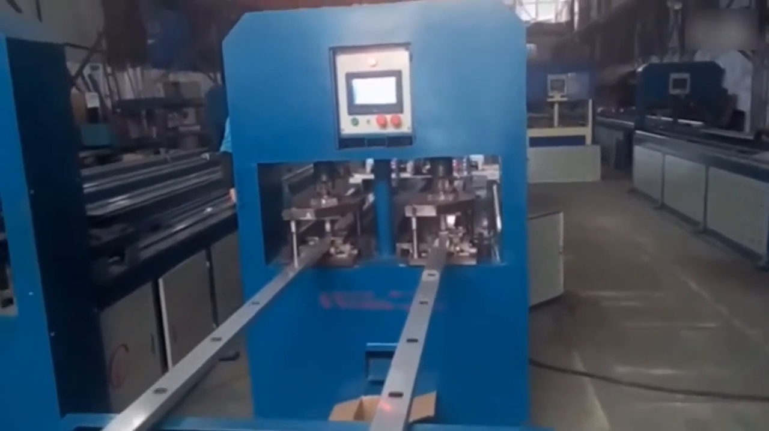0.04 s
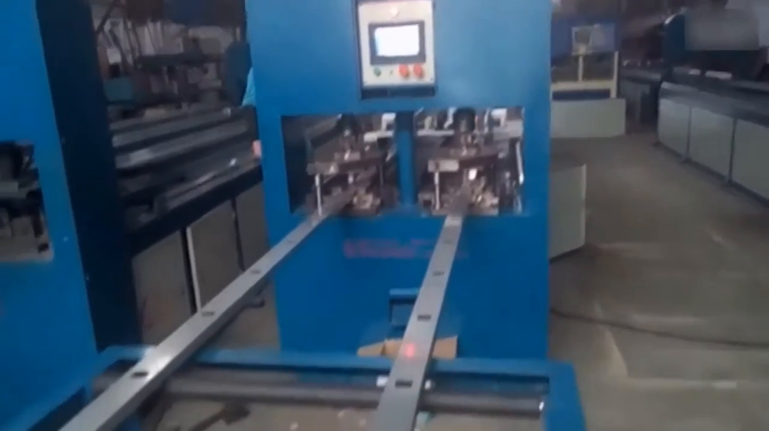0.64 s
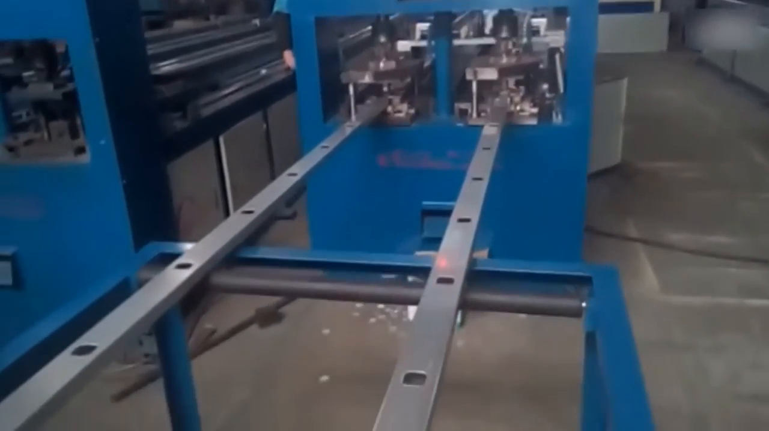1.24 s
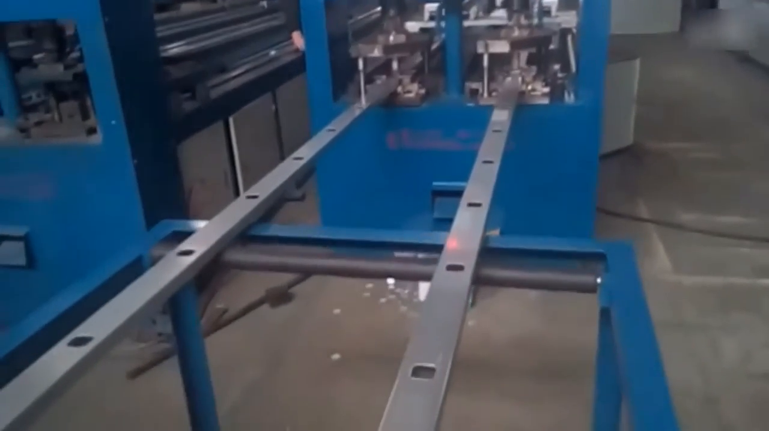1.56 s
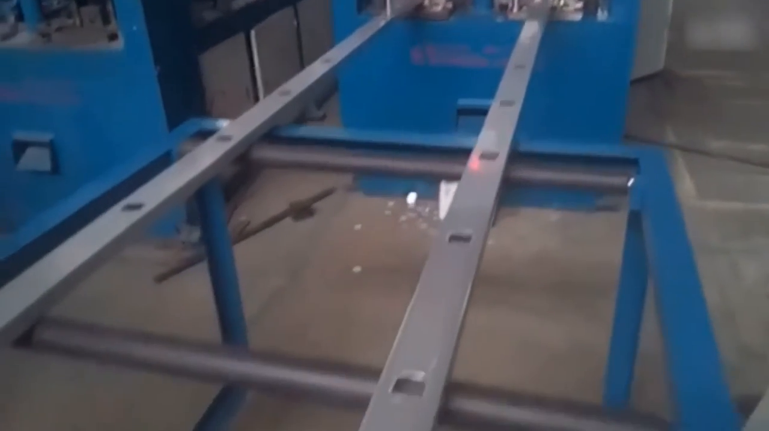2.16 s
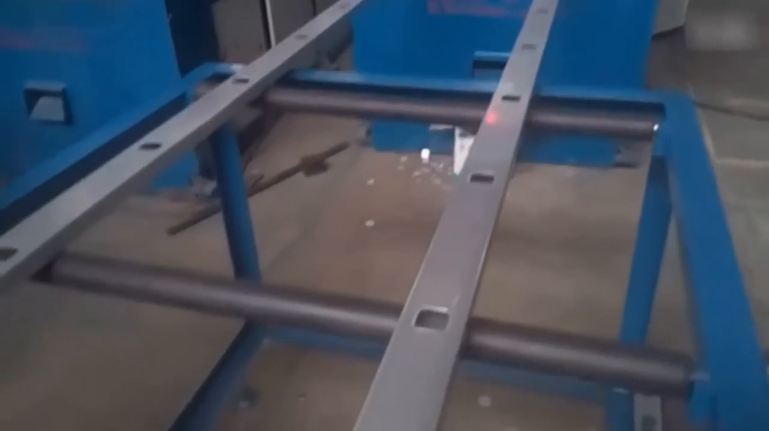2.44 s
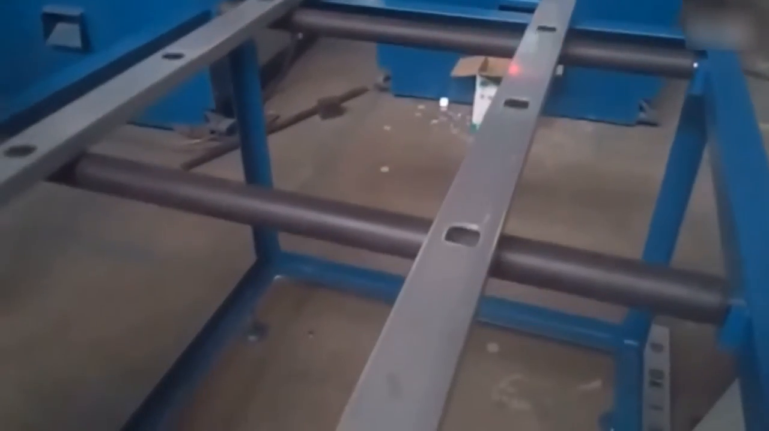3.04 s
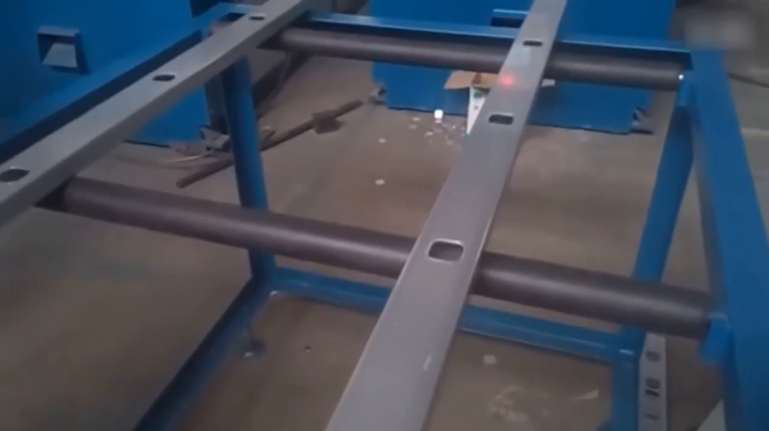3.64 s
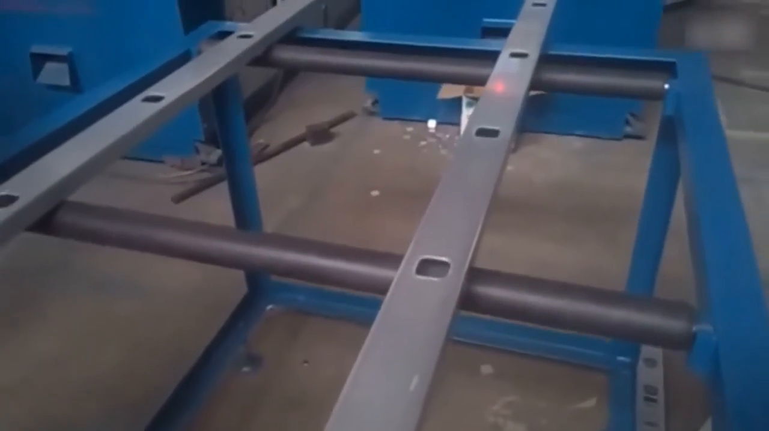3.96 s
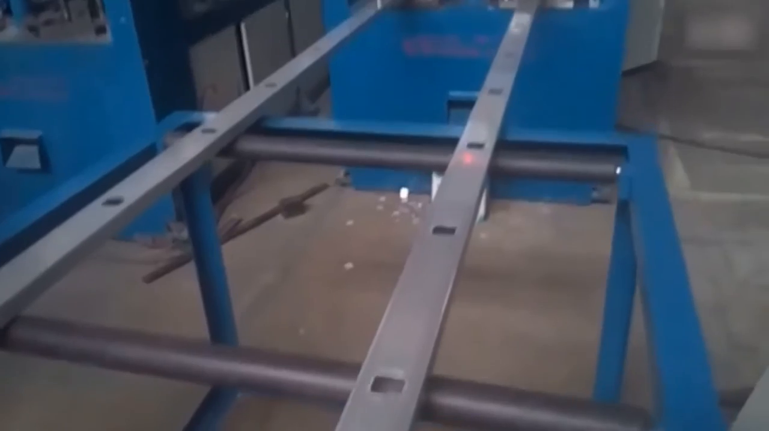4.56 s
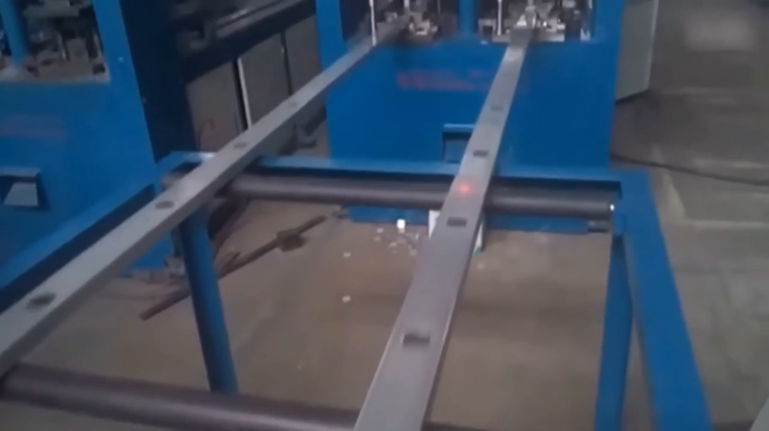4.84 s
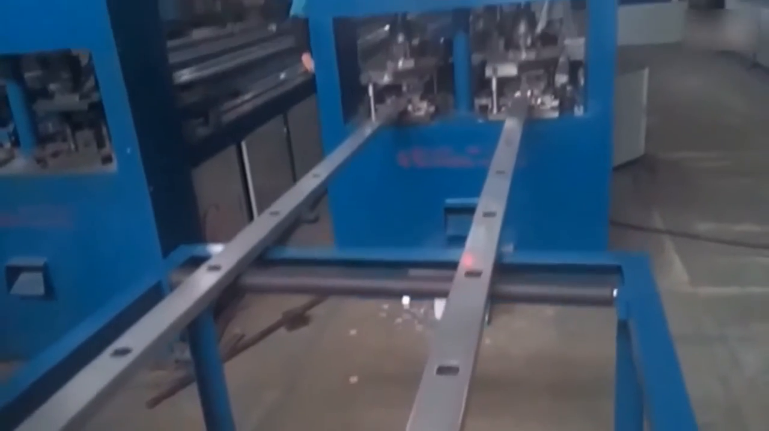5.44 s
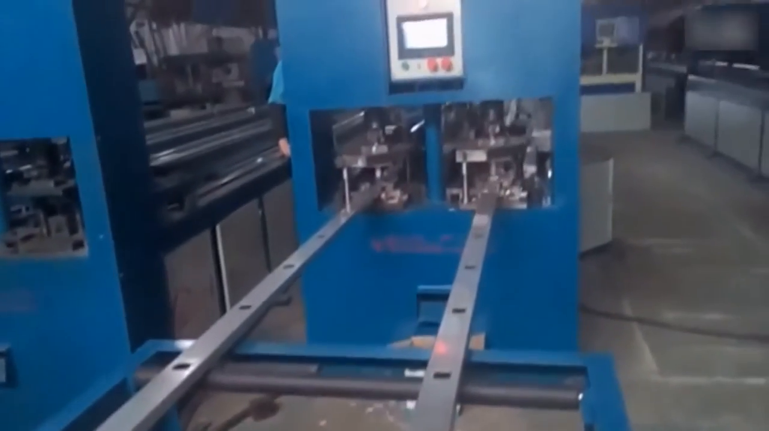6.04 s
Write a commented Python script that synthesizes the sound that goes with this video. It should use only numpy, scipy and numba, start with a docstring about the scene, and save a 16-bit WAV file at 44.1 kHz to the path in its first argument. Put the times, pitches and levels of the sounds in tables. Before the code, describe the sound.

A punching machine strikes metal bars four times with sharp, ringing clanks, while rollers rumble and clatter over a factory drone.

```python
"""Punching metal in a factory hall

A machine punches two hollow metal bars, one stroke about every 1.55 s. The bars rumble and knock
forward over rollers and clack in their guides. The punch strikes, the bars ring, and it pulls out
with a puff of air. Another machine clanks further off, over the drone of the hall.
A phone's automatic volume control turns the sound down after each loud blow."""
import sys
import numpy as np
from scipy import signal
from scipy.fft import rfft, irfft, next_fast_len
from scipy.io import wavfile
from scipy.ndimage import uniform_filter1d, minimum_filter1d
from numba import njit

SR = 44100
rng = np.random.default_rng(int(sys.argv[2]) if len(sys.argv) > 2 else 0)


def generate_wav(signal):
    """Clip the signal to [-1, 1] and save it as 16-bit WAV at the path in sys.argv[1]."""
    frames = np.transpose(np.atleast_2d(signal))
    scaled = np.clip(frames, -1, 1) * 32767
    pcm = np.round(scaled).astype(np.int16)
    wavfile.write(sys.argv[1], SR, pcm)


N = 277830
TIME = np.arange(N) / SR

# Punch strokes. Each brings out one extra note, set by the length of the bar.
# start_s, swell_s, blow_db, clank_db, ring_db, note_hz, note_db
STROKES = [(1.065, 0.003, -2, -4.5, -1.5, 3095, 2.5), (2.622, 0.0022, 2, -7.5, -2, 2630, -11),
           (4.15, 0.022, -0.5, -12, -1.5, 3874, -5.5), (5.705, 0.019, 0.5, -3, 0.5, 2750, -5)]
# The punch pulling back out: start_s, jolt_db, air_db, squeak_db, ring_db
RETURNS = [(1.242, -14, -1, -18, -8.5), (2.796, -12, -11, -9.5, -8.5), (4.335, -17, 1.5, -7.5, -6),
           (5.880, -10.5, 1, -19.5, -3)]
# Tone of the blow: pitch_hz, level_db
BLOW_TONE = [(100, -38.5), (600, -12.5), (1200, 5.5), (1750, 11), (3000, 10.5), (4200, 12), (5500, 6.5),
             (7000, 3), (10000, 16), (15000, -11)]
# Notes of the die, the block under the punch: pitch_hz, level_db, fade_s (time to fall by 60 dB)
DIE_NOTES = [(1668, 7.5, 0.094), (1865, 4, 0.096), (1915, -11.5, 0.099), (2190, -1, 0.2), (2523, 7, 0.11),
             (2716, 0.5, 0.48), (3110, -4, 0.92)]

def punch():
    """The punch snaps and crunches through the metal, clanks on the die and jolts as it pulls out."""
    snap = bursts([(start, swell, 0.17, db) for start, swell, db, *_ in STROKES])
    crunch = bursts([(start, swell + 0.012, 0.45, db - 5) for start, swell, db, *_ in STROKES])
    jolt = bursts([(start, 0.022, 0.25, db) for start, db, *_ in RETURNS])
    contact = (np.hypot(snap, crunch) + jolt) * grains(BLOW_TONE, rough_db=1)
    clank = sum(undb(db) * ring(start + swell / 2, DIE_NOTES, swell,
                                flutter_db=2.5, waver_hz=24, detune=0.025)
                for start, swell, _, db, *_ in STROKES)
    return contact + clank


# Notes of the struck bars and die: pitch_hz, level_db, fade_s
BAR_NOTES = [(1506, -15.5, 0.38), (1670, -25, 0.41), (2040, 1, 0.63), (2250, -3.5, 1.1), (2250, -0.5, 0.56),
             (2508, -3.5, 0.79), (2504, -6, 0.83), (2712, 6, 0.58), (2940, -5.5, 1.1), (3170, -7, 0.68),
             (3190, -9, 0.54), (3370, -7.5, 0.6), (3640, 0.5, 0.46), (4300, -16, 0.19), (5100, -13.5, 0.85),
             (5210, -7.5, 0.69)]

def ringing_bars():
    """Every stroke and every return sets the bars shimmering, rattling and ringing."""
    blows = [(start, db) for start, _, _, _, db, *_ in STROKES]
    blows += [(start, db) for start, *_, db in RETURNS]
    shaking = bursts([(start, 0.02, 0.72, db) for start, db in blows])
    jangle = shaking * (undb(-6) * shimmer() + undb(-7) * rattle())
    notes = sum(undb(db - 14.5) * ring(start, BAR_NOTES, swell_s=0.05,
                                       flutter_db=-0.5, waver_hz=18.8, detune=0.012)
                for start, db in blows)
    extra_notes = sum(ring(start + 0.025, [(hz, db, 0.33)], swell_s=0.06, flutter_db=3, waver_hz=28)
                      for start, *_, hz, db in STROKES)
    return jangle + notes + extra_notes


def rattle(bounces_per_s=45, scatter_db=5, fade_share=0.2):
    """The loose bars bounce at random. Each bounce plays a new mix of notes, cut short by the guides."""
    bounces = np.flatnonzero(rng.random(N) < bounces_per_s / SR)
    out = 0
    for hz, db, fade in BAR_NOTES:
        force = np.zeros(N)
        force[bounces] = undb(db + scatter_db * np.tanh(rng.standard_normal(N)[bounces]))
        # this filter turns each bounce into a fading note
        pole = np.exp((2j * np.pi * hz - np.log(1000) / (fade * fade_share)) / SR)
        out = out + signal.lfilter([1], [1, -pole], force).imag
    return unit(out)


# Groups of close notes in the metalwork: pitch_hz, width_hz, level_db
METAL_BANDS = [(1757, 170, 1.5), (1950, 345, 6), (2259, 89, 9.5), (2740, 860, 3.5), (3090, 240, -3.5),
               (3660, 210, 1)]

def shimmer():
    """Many close notes of the metalwork blur into a steady, ringing noise."""
    return resonate(rng.standard_normal(N), METAL_BANDS)


# Tone of the puff of air: pitch_hz, level_db
AIR_TONE = [(1000, -45), (3000, -27), (4500, 12.5), (6500, 2.5), (8500, -21), (11000, -17), (15000, -13),
            (18000, 18.5)]

def pull_out(low_hz=1500, high_hz=2250, glide_s=0.02):
    """A valve lets out air, and the punch slides out of the hole with a rough, rising squeak."""
    puffs = bursts([(start, 0.024, 0.14, db) for start, _, db, *_ in RETURNS])
    out = puffs * grains(AIR_TONE, rough_db=1)
    for start, _, _, db, _ in RETURNS:
        hz = high_hz + (low_hz - high_hz) * np.exp(-np.maximum(TIME - start, 0) / glide_s)
        squeak = wavering_note(hz, waver=0.05, rate_hz=700)
        out += undb(db + 3 * wander(220)) * rise_hold_fall(start, 0.02, 0.03, 0.035) * squeak
    return out


# The feed that moves the bars forward before each stroke: pull_db, slide_db, brake_db, growl_db
FEEDS = [(-26, -24.5, -16.5, -25.5), (-24, -19, -15.5, -20), (-21.5, -22.5, -18.5, -27),
         (-24.5, -22, -16.5, -23.5)]
# The bars jerking in their guides: start_s, swell_s, body_db, sizzle_db
JERKS = [(0.549, 0.046, -13.5, -8.5), (2.096, 0.059, -10, -9), (3.67, 0.019, -11.5, -5),
         (5.022, 0.019, -24, -16), (5.22, 0.037, -13, -15.5)]
# Tones of the clatter's body and of its bright sizzle: pitch_hz, level_db
BODY_TONE = [(100, -1), (400, 0.5), (800, 4.5), (1200, 6.5), (2000, 4.5), (2800, 2.5), (4000, -7.5),
             (6000, -13), (9000, -22), (15000, -36)]
SIZZLE_TONE = [(1000, -20), (2500, 14), (3700, 7), (5200, 5.5), (6500, 0.5), (8000, 11.5), (10500, 4),
               (12000, -13), (15000, -18)]

def clatter(slide_lead_s=0.267, brake_lead_s=0.12, sizzle_fade_share=0.86):
    """The bars chatter against their guides as they jerk, slide and brake before each stroke."""
    body = unit(grains(BODY_TONE, rough_db=3) + undb(-5) * shimmer())
    sizzle = grains(SIZZLE_TONE, rough_db=2.5)
    # start_s, swell_s, fade_s, body_db, sizzle_db
    contacts = [(start, swell, 0.35, *levels) for start, swell, *levels in JERKS]
    for (strike, *_), (_, slide_db, brake_db, _) in zip(STROKES, FEEDS):
        contacts.append((strike - slide_lead_s, 0.03, 0.31, slide_db - 7, slide_db))
        contacts.append((strike - brake_lead_s, 0.048, 1, brake_db, brake_db - 13.5))
    body_level = bursts([row[:4] for row in contacts])
    sizzle_level = bursts([(start, swell, fade * sizzle_fade_share, db)
                           for start, swell, fade, _, db in contacts])
    return body * body_level + sizzle * sizzle_level


# The bars hitting their steel guides: start_s, level_db
CLACKS = [(0.586, -23.5), (0.600, -10), (0.823, -18.5), (1.000, -19), (2.15, -14), (2.173, -12),
          (2.386, -18), (2.537, -17), (2.552, -11.5), (3.685, -16.5), (3.705, -10.5), (3.93, -17.5),
          (4.352, -11), (5.241, -9.5), (5.260, -14), (5.487, -21)]
# Tone of a crack or a scrape: pitch_hz, level_db
CRACK_TONE = [(1500, -22), (3600, 0), (6500, 0), (9000, -3), (11000, -8), (15000, -22), (18000, -40)]
# Where the guides ring: pitch_hz, width_hz, level_db
GUIDE_BANDS = [(1104, 160, -2.5), (1850, 180, 0), (2340, 240, -6.5), (2800, 270, 1.5), (3240, 170, 1),
               (3870, 260, -1), (4380, 300, -13.5), (5320, 500, -12.5)]

def clacks():
    """Steel hits steel: a bright crack, then a brief, rough chatter in the guide."""
    crack_level = bursts([(start, 0.001, 0.066, db - 2) for start, db in CLACKS])
    crack = grains(CRACK_TONE, rough_db=6)
    chatter_level = bursts([(start, 0.003, 0.096, db + 2.5) for start, db in CLACKS])
    chatter = resonate(rng.standard_normal(N) * undb(3 * wander(350)), GUIDE_BANDS)
    return crack_level * crack + chatter_level * chatter


# Scrapes of the bars' edges and the clamps: start_s, swell_s, fade_s, level_db
SCRAPES = [(0.355, 0.0079, 0.087, -37), (0.806, .005, .2, -21), (0.972, 0.0028, 0.072, -22),
           (1.185, 0.03, 0.37, -15), (1.43, 0.11, 0.94, -33), (1.76, 0.049, 0.37, -34.5),
           (2.265, .012, 0.14, -29), (2.538, 0.023, 0.096, -28.5), (4.066, .01, .15, -26.5),
           (4.143, .008, 0.11, -11), (4.315, 0.017, 0.14, -13.5), (4.862, 0.0034, 0.12, -32.5),
           (5.023, 0.0039, 0.15, -27.5), (5.626, 0.0071, .2, -38), (5.915, 0.013, 0.17, -15)]

def scrapes():
    """Sharp edges catch and slip in short, gritty bursts."""
    return bursts(SCRAPES) * grains(CRACK_TONE, rough_db=4, rate_hz=300)


# Tone of the rollers: pitch_hz, level_db
RUMBLE_TONE = [(25, -12), (55, -48), (110, 3), (190, -1), (280, -1), (500, 1), (750, -6.5), (1300, -35),
               (3000, -54), (8000, -58), (15000, -71.5)]

def rollers(lead_s=0.671, rise_s=0.026, stop_lead_s=0.0096, surge_hz=5.82, surge_db=4):
    """The rollers rumble in surges as they push the bars, then drop to idle as the punch strikes."""
    level = undb(-34.5)  # idling
    for (strike, *_), (pull_db, *_) in zip(STROKES, FEEDS):
        start = strike - lead_s
        load_db = np.interp(TIME, [start, strike], [pull_db, -24])
        load_db -= surge_db * np.cos(2 * np.pi * surge_hz * (TIME - start))
        pushing = rise_hold_fall(start, rise_s, lead_s - rise_s - stop_lead_s, 0.035)
        level = np.hypot(level, undb(load_db) * pushing)
    return level * grains(RUMBLE_TONE, rough_db=2.5, rate_hz=89)


# Dull knocks of the roller stand: start_s, pitch_hz, level_db
KNOCKS = [(0.065, 535, -12.5), (0.425, 499, -14), (0.473, 495, -15), (0.681, 308, -8), (0.828, 290, -11),
          (0.879, 240, -9.5), (0.953, 410, -9), (1.010, 543, -12.5), (1.040, 605, -14), (1.993, 437, -10),
          (2.138, 384, -15.5), (2.165, 445, -12.5), (2.184, 313, -4), (2.395, 427, -10.5),
          (3.294, 387, -14.5), (3.380, 375, -9), (3.544, 297, -12.5), (3.662, 296, -13), (3.726, 322, -17),
          (3.932, 227, -10.5), (4.053, 450, -12.5), (4.494, 295, -14.5), (5.047, 388, -14),
          (5.150, 318, -11.5), (5.270, 233, -12.5), (5.391, 305, -12), (5.600, 569, -11),
          (5.660, 595, -13.5), (6.016, 516, -8.5)]
# Notes within one knock: pitch_ratio, level_db, fade_s
KNOCK_NOTES = [(0.721, -10, 0.076), (1, 1, 0.1), (1.37, -2.5, 0.03)]

def knocks():
    """The bars bump over the rollers, and the stand answers with a short, hollow note."""
    out = 0
    for start, hz, db in KNOCKS:
        notes = [(hz * ratio, note_db, fade) for ratio, note_db, fade in KNOCK_NOTES]
        out = out + undb(db) * ring(start, notes, swell_s=0.0042, flutter_db=1, waver_hz=13.5)
    return out


# Brief, thin metal notes: start_s, length_s, pitch_hz, level_db
THIN_NOTES = [(0.297, 0.11, 5040, -31), (0.825, 0.04, 6250, -28), (2.655, 0.035, 2740, -10),
              (2.738, 0.024, 2634, -7), (3.163, 0.15, 2887, -25), (4.213, 0.06, 3870, -14),
              (4.668, 0.06, 5010, -23.5), (4.797, 0.1, 5010, -32), (5.925, 0.06, 3720, -20)]

def thin_notes():
    """Brief, unsteady metal notes: swells and tails of the bars' ringing, and a few high squeals."""
    out = 0
    for start, length, hz, db in THIN_NOTES:
        swell = np.sin(np.pi * np.clip((TIME - start) / length, 0, 1))
        level = undb(db + 3 * wander(110)) * swell
        out = out + level * wavering_note(hz, waver=0.00794, rate_hz=300)
    return out


# Where the machine's frame rings: pitch_hz, width_hz, level_db
FRAME_BANDS = [(123, 27, 2.5), (170, 23, -0.5), (239, 50, 3), (294, 54, -3)]

def growl(lead_s=0.55, rise_s=0.45, fall_s=0.024):
    """The drive works harder towards the end of each feed and shakes the frame."""
    hold_s = lead_s - rise_s - fall_s
    level = sum(undb(db) * rise_hold_fall(strike - lead_s, rise_s, hold_s, fall_s)
                for (strike, *_), (*_, db) in zip(STROKES, FEEDS))
    return level * resonate(rng.standard_normal(N), FRAME_BANDS)


# Clanks further down the hall: start_s, swell_s, fade_s, crash_db, boom_db, ring_db
FAR_CLANKS = [(0.042, 0.032, 0.56, -9, -14.5, -15), (0.140, 0.022, 1, -15.5, -24, -22.5),
              (4.619, 0.004, 0.46, -12, -13, -23), (4.773, 0.018, 0.14, -20, -27, -27.5)]
# Tones of their crash and boom: pitch_hz, level_db
CRASH_TONE = [(100, -41.5), (400, -13), (700, 1), (1050, 1), (1450, 5), (1900, 4), (2700, 7), (3800, 0),
              (5200, -4), (7000, -11), (10000, -16), (15000, -27)]
BOOM_TONE = [(300, -25), (550, -3), (850, -3.5), (1080, 3), (1400, -9), (2200, -15.5), (6000, -37)]
# Notes they ring with: pitch_hz, level_db, fade_s
FAR_NOTES = [(905, -13, 0.66), (1040, -11, 0.79), (1255, -5, 1), (1570, -1, .45), (1930, -4, 1),
             (2684, 1.5, 0.53), (2780, -1, 0.52), (3040, -11, 0.95), (3220, -12, 1)]

def far_machine():
    """Another machine crashes, booms and rings, blurred by distance."""
    crash = bursts([row[:4] for row in FAR_CLANKS]) * grains(CRASH_TONE, rough_db=-0.5, rate_hz=240)
    boom_level = bursts([(start, swell, fade, db) for start, swell, fade, _, db, _ in FAR_CLANKS])
    boom = boom_level * grains(BOOM_TONE, rough_db=8.5, rate_hz=900)
    notes = sum(undb(db) * ring(start + swell / 2, FAR_NOTES, swell, flutter_db=2.5, waver_hz=14)
                for start, swell, *_, db in FAR_CLANKS)
    return crash + boom + notes


def buzz(delay_s=0.33, idle_db=-29.5, moving_db=-23.5):
    """Loose metalwork buzzes, louder and with a hiss while the punch head travels back."""
    strikes = [start for start, *_ in STROKES]
    strikes.insert(0, strikes[0] - 1.67)  # the machine is already running
    travel = sum(rise_hold_fall(strike + delay_s, 0.15, 0.3, 0.11) for strike in strikes)
    level = np.hypot(undb(idle_db), undb(moving_db) * travel) * undb(2.6 * wander(60))
    return level * shimmer() + undb(-41) * travel * grains(SIZZLE_TONE, rough_db=1.5)


# Tone of the hall's noise: pitch_hz, level_db
HALL_TONE = [(25, -16.5), (45, -15.5), (70, -5), (120, -0.5), (200, 0), (290, 3), (400, -3), (900, -3),
             (1400, -7), (2300, -5), (3200, -7.5), (4300, -19.5), (5200, -16.5), (7000, -23)]
# Notes of the pumps: pitch_hz, level_db
PUMP_NOTES = [(119.5, -34.5), (296, -34.5), (314, -33)]
# A brief dip in the drone near the start: time_s, level_db
DRONE_DIP = [(0, 0), (.24, -5.5), (.42, 0)]

def drone():
    """Pumps hum under the noise of the hall."""
    noise = grains(HALL_TONE + [(9000, -42), (15000, -70)], rough_db=2.2, rate_hz=120)
    noise *= undb(-20.5 + 0.8 * wander(5))
    hum = sum(undb(db + 1.6 * wander(12)) * unit(wavering_note(hz, waver=0.0184, rate_hz=25))
              for hz, db in PUMP_NOTES)
    return undb(np.interp(TIME, *np.transpose(DRONE_DIP))) * (noise + hum)


# Tone of the echo, compared with the direct sound: pitch_hz, level_db
ECHO_TONE = [(100, -5), (2500, -5), (6000, -6.5), (9000, -13.5), (15000, -56)]

def hall_echo(sound, fade_s=1.1):
    """The hall throws the sound back as a dull blur of echoes."""
    tail = rng.standard_normal(N) * burst(0, 0.000063, fade_s)
    tail /= np.sqrt(np.sum(tail ** 2))
    return colour(signal.fftconvolve(sound, tail)[:N], ECHO_TONE)


def undb(db):
    """Turn decibels into a number to multiply by."""
    return 10 ** (np.asarray(db) / 20)


def unit(sound):
    """Scale to an average (rms) level of 1."""
    return sound / np.sqrt(np.mean(sound ** 2))


def colour(sound, tone):
    """Shape the lows and highs along a curve of (pitch_hz, level_db) points."""
    hz, db = np.transpose(tone)
    size = next_fast_len(N + 8192)
    bins_hz = np.maximum(np.fft.rfftfreq(size, 1 / SR), 1)
    gain = undb(np.interp(np.log(bins_hz), np.log(hz), db))
    return irfft(rfft(sound, size) * gain, size)[..., :N]


def wander(rate_hz):
    """A smooth random drift, about 1 in size."""
    step = max(int(SR / rate_hz), 1)
    stairs = np.repeat(rng.standard_normal(N // step + 1), step)
    return unit(uniform_filter1d(stairs, step)[:N])


def grains(tone, rough_db, rate_hz=500):
    """Rough noise, like many tiny hits of uneven strength."""
    hits = rng.standard_normal(N) * undb(rough_db * np.tanh(wander(rate_hz)))
    return unit(colour(hits, tone))


def wavering_note(hz, waver, rate_hz):
    """A pure note that drifts by a share (waver) of its pitch."""
    return np.sin(2 * np.pi * np.cumsum(hz * (1 + waver * wander(rate_hz))) / SR)


def burst(start_s, swell_s, fade_s):
    """A level that swells to 1, then falls 60 dB every fade_s."""
    age = TIME - start_s
    rise = np.clip(age / swell_s, 0, 1) ** 2
    return rise * np.exp(-np.log(1000) * np.maximum(age - swell_s, 0) / fade_s)


def bursts(rows):
    """The joint level of several bursts: start_s, swell_s, fade_s, level_db."""
    return np.sqrt(sum((undb(db) * burst(start, swell, fade)) ** 2 for start, swell, fade, db in rows))


def rise_hold_fall(start_s, rise_s, hold_s, fall_s):
    """A level that rises to 1, holds and falls, in straight lines."""
    age = TIME - start_s
    return np.clip(np.minimum(age / rise_s, 1 + (rise_s + hold_s - age) / fall_s), 0, 1)


def ring(start_s, notes, swell_s, flutter_db, waver_hz, detune=0):
    """Fading notes after one blow. The parts lie loose, so each note wobbles in level and pitch."""
    first = int(start_s * SR)
    length_s = min(max(fade for *_, fade in notes), 1)
    age = TIME[:min(int(SR * length_s), N - first)]
    wobble_times = np.linspace(0, 1, 60)
    out = np.zeros(N)
    for hz, db, fade in notes:
        flutter, waver = (np.interp(age, wobble_times, rng.standard_normal(60)) for _ in range(2))
        pitch = hz * (1 + detune * rng.standard_normal()) + waver_hz * waver
        wave = np.sin(2 * np.pi * (np.cumsum(pitch) / SR + rng.random()))
        level = np.minimum(age / swell_s, 1) * np.exp(-np.log(1000) * age / fade)
        out[first:first + len(age)] += undb(db + flutter_db * flutter) * level * wave
    return out


def resonate(force, bands):
    """Keep the pitches at which a part rings; filtering twice makes each band's edges steep."""
    out = 0
    for hz, width_hz, db in bands:
        b, a = signal.iirpeak(hz, hz / width_hz, fs=SR)
        out = out + undb(db) * signal.lfilter(b, a, signal.lfilter(b, a, force))
    return unit(out)


# Stereo width, the side signal compared with the middle: pitch_hz, level_db
STEREO_WIDTH = [(30, -15), (100, -26.5), (300, -34.5), (600, -23), (3200, -27), (3800, -17.5), (4400, -5),
                (8000, -4.5), (15000, -8)]

def scene():
    """The machines in their hall. Left and right differ mostly in the high pitches."""
    machines = punch() + ringing_bars() + pull_out()
    machines += clatter() + clacks() + scrapes() + rollers() + knocks() + far_machine()
    middle = machines + hall_echo(machines) + growl() + thin_notes() + drone() + buzz()
    # sound arrives from ever-changing directions
    direction = np.cos(2 * np.pi * np.cumsum(40 * wander(100)) / SR)
    side = colour(signal.hilbert(middle).imag * unit(direction), STEREO_WIDTH)
    return np.array([middle + side, middle - side])


@njit
def follow_peaks(levels, rise_step, fall_step, hold_samples):
    """Track the loudness: rise quickly, hold each new peak, then fall slowly."""
    out = np.empty(len(levels))
    smooth, peak, wait = 0., 0., 0.
    for i, level in enumerate(levels):
        smooth += (level - smooth) * (rise_step if level > smooth else fall_step)
        if smooth >= peak:
            peak, wait = smooth, hold_samples
        elif wait > 0:
            wait -= 1
        else:
            peak -= peak * fall_step
        out[i] = peak
    return out


# Tone of the microphone, dull at the top: pitch_hz, level_db
MICROPHONE_TONE = [(30, -5), (6500, 0), (7400, -7), (8100, -28), (10200, -25), (11500, -40.5), (15000, -30)]

def record(dry, threshold_db=-1, rise_s=0.0065, hold_s=0.0406, fall_s=0.29, top_hz=15400):
    """The volume dips on loud blows and the highs are dulled. The hardest peaks squash and crackle."""
    loudness = follow_peaks(np.abs(dry).max(axis=0), 1 / (rise_s * SR), 1 / (fall_s * SR), hold_s * SR)
    turned_down = colour(dry / np.maximum(loudness / undb(threshold_db), 1), MICROPHONE_TONE)
    peak_gain = 1 / np.maximum(np.abs(turned_down).max(axis=0) / 1.1, 1)
    limited = turned_down * uniform_filter1d(minimum_filter1d(peak_gain, size=45), size=45)
    rounded = limited / (1 + limited ** 12) ** (1 / 12)
    return signal.sosfilt(signal.ellip(8, 0.2, 70, top_hz, fs=SR, output="sos"), rounded)


dry = scene()
out = record(dry)
generate_wav(out)
```